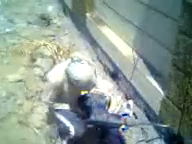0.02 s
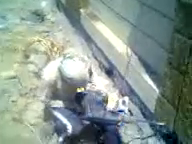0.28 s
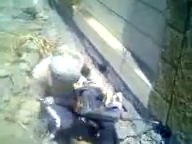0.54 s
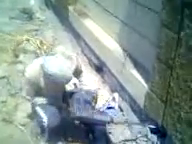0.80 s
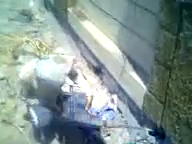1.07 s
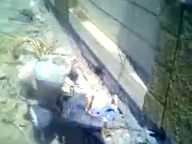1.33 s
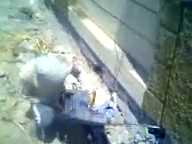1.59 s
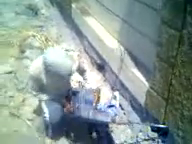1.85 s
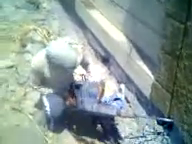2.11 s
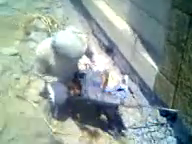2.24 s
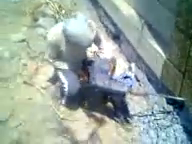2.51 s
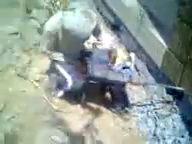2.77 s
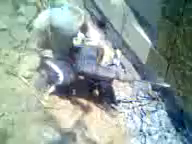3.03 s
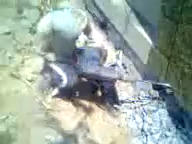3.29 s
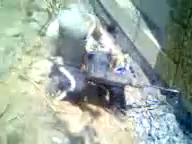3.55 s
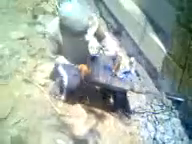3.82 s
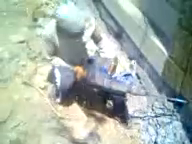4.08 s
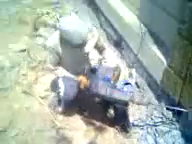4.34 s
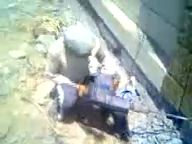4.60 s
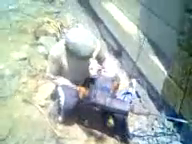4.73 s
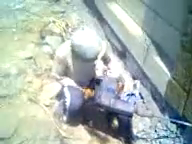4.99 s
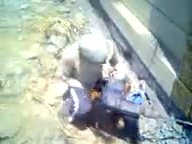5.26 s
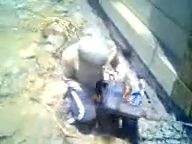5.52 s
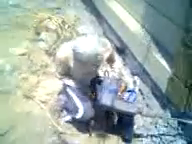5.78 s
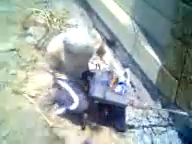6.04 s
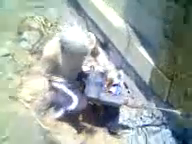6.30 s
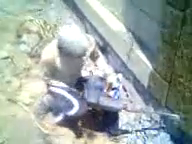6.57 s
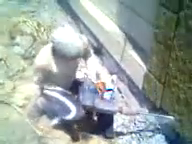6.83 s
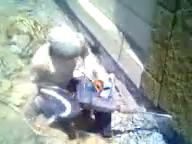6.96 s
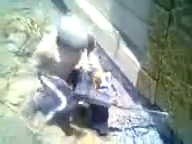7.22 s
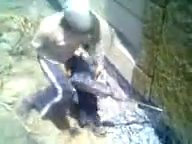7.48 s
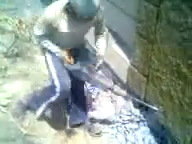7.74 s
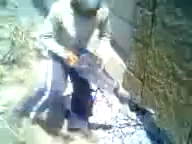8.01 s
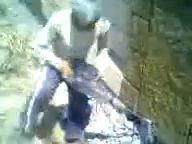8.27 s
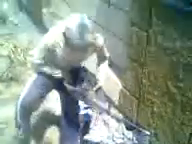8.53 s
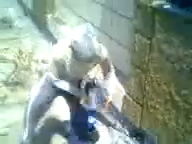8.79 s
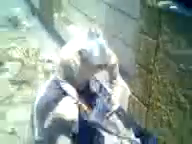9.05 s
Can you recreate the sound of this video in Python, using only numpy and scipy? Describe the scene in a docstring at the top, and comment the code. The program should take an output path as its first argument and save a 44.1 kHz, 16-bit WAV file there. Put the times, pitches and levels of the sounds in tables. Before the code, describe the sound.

An electric demolition breaker hammers a brick wall outdoors, close to a small phone microphone, at about 28 blows a second. Each blow combines a steel clank and crack with a gritty low thump when the chisel bites. The first burst stops at about 0.5 seconds; the freed chisel rings briefly with a high tone, and the motor whirs on quietly with a fan hiss. A second burst runs from 2.7 to 3.8 seconds, ending in bright ringing, then the motor fades low. The longest burst lasts from 5.4 to 7.4 seconds, followed by a faint jingle of the loose chisel. Hammering returns near 8 seconds, lighter and more metallic at first, ending on a hard hit at 8.6. The chisel jingles again and the motor coasts down. The sound is narrow and distorts on hard blows, with a very short echo and barely audible background rumble.

```python
"""An electric breaker hammers a brick wall about 28 times a second, close to a small phone microphone.
In each blow the piston clanks, the steel cracks and, when the chisel bites, the brick thumps, heard through
the overloaded phone as a falling chirp. After half a second the freed chisel rings; the motor whirs on.
Bursts return near 2.7, 5.4 and 8 s; the loose chisel jingles after the last two, and the motor coasts.
Throughout, the phone keeps a narrow band and clips on hard blows, which alone puts sound above it."""
import sys
import numpy as np
from scipy import signal
from scipy.fft import rfft, irfft, next_fast_len
from scipy.io import wavfile
from scipy.ndimage import uniform_filter1d, map_coordinates

SR = 44100
rng = np.random.default_rng(int(sys.argv[2]) if len(sys.argv) > 2 else 0)


def generate_wav(signal):
    """Clip the signal to [-1, 1] and save it as 16-bit WAV at the path in sys.argv[1]."""
    frames = np.transpose(np.atleast_2d(signal))
    scaled = np.clip(frames, -1, 1) * 32767
    pcm = np.round(scaled).astype(np.int16)
    wavfile.write(sys.argv[1], SR, pcm)


N = 403956

# Chisel blows, levels relative within each column:
# (time [s], crack [dB], thump [dB], nominal length [ms], final chirp pitch [Hz], chisel ring [dB])
BLOWS = [(0.002, -6.5, -13.5, 3.3, 363.5, -8), (0.032, -0.5, -3, 11.0, 288.5, -25),
         (0.07, -7, -6, 13.0, 304, -25), (0.105, -10, -7.5, 10, 421, -15.5),
         (0.138, -4.5, 1, 4.7, 245, -36.5), (0.172, -6.5, -5.5, 5.1, 224, -28),
         (0.208, -33.5, -39.5, 6.0, 697, -34), (0.246, -4.5, -12.5, 9.4, 386, -32.5),
         (0.282, -5, -48.5, 2.0, 470, -21.5), (0.319, -42, -40, 18.0, 482, -42.5),
         (0.348, -9, -6.0, 12.0, 239, -29.5), (0.384, -38.5, -32, 2.1, 351, -37),
         (0.421, -25, -46.0, 4.6, 960, -31.5), (0.459, -4, 4.5, 4.4, 603, -27.5),
         (2.736, -23.5, -51.5, 6.6, 780, -25.5), (2.778, -6, -5, 10, 427.5, -34),
         (2.818, -10, -2, 5.1, 455, -20), (2.85, -7, -8.5, 4.4, 378.5, -46),
         (2.887, -3, -3, 4.6, 294.2, -29.5), (2.922, -4.5, -4.5, 2.0, 468, -30.5),
         (2.957, -4, 0.5, 6.0, 394, -17), (2.968, -29, -7.5, 3.5, 300, -40.5),
         (2.992, -3.0, -5.5, 4.2, 319, -31), (3.023, -3.5, -25, 5.2, 863, -50.5),
         (3.061, -2.5, -2.5, 9.2, 400, -29.5), (3.097, -15.5, 1, 8.2, 246, -19.5),
         (3.135, -17.0, -8, 11.0, 222, -39.0), (3.205, -10.5, 0, 8.2, 431, -40.5),
         (3.241, -8, -5.5, 7, 349, -49), (3.306, -7, -5, 10, 696.4, -42.5),
         (3.334, -22.5, -50.5, 4.9, 451, -50), (3.452, -19, -53, 6.6, 857, -36.5),
         (3.485, -13, -7.5, 11, 458.4, -31.5), (3.519, -20.5, -49.5, 5.1, 570, -40),
         (3.557, -5.5, -0.5, 10.0, 391.5, -45.5), (3.592, -4.5, -14.5, 4.4, 688, -26.5),
         (3.626, -5, -3.5, 17.6, 577, -28), (3.644, -49, -2.5, 6.8, 542, -38.5),
         (3.661, -5, -6.5, 5, 477, -42.0), (3.697, -2, -0.5, 14, 358, -30.5),
         (3.717, -30.5, -3.5, 5, 280, -38), (3.733, -8.0, -8.5, 5.3, 246, -22),
         (3.773, -4.5, -6.5, 42, 606.5, -9), (3.791, -1.5, -9, 23, 724, -25),
         (3.806, 0.5, -12, 7.7, 645, -9.5), (5.388, -3, -3, 12, 523, -43), (5.405, -26, -7, 8.9, 425, -27),
         (5.423, -3.5, -4.5, 11, 405, -40.5), (5.434, -25, -2.5, 2.7, 447, -45),
         (5.443, -22, -3.5, 9, 550, -36.5), (5.492, -11.5, -51.5, 3.5, 680, -15.5),
         (5.523, -3.5, -1.5, 4.9, 725, -20.5), (5.562, -9.5, -11, 1.4, 673, -17),
         (5.601, -3, -8.5, 8.0, 322, -16), (5.637, -2.5, -3, 18.0, 659, -20),
         (5.671, -8, -5, 12, 242.7, -16), (5.702, -24, -17.5, 5.4, 440, -17.5),
         (5.74, -9.5, -9, 1.3, 440, -30.5), (5.776, -6.5, -6.5, 4.8, 247.3, -30.5),
         (5.816, -5.5, -4.5, 10, 277.7, -38.5), (5.845, -5, -8, 2.6, 800, -18),
         (5.88, -16, -20.5, 4.9, 527, -30), (5.912, -14, -47.5, 5.5, 605, -26),
         (5.95, -14, -20, 3.3, 459, -19), (5.985, -13.5, -39, 28, 445, -23.5),
         (6.026, -7, -4, 20.0, 288.7, -23), (6.063, -11.5, -9.5, 7.3, 250, -36.5),
         (6.098, -12, -0.5, 8.4, 447, -33.5), (6.13, -7.5, -4.5, 4.4, 218, -44),
         (6.162, -12, -27.5, 3.8, 481, -51), (6.196, -12, -23, 4.5, 490, -50),
         (6.236, -16.5, -4.5, 20.0, 343, -44.5), (6.263, -35, -3.5, 20, 447, -49),
         (6.303, -16, -18, 2.3, 595, -21), (6.339, -15.5, -18.5, 4, 678, -49),
         (6.372, -12.0, -39, 4.9, 930, -26), (6.412, -6, -3.5, 8.5, 253.7, -50.5),
         (6.444, -11, -24, 1.9, 439, -30), (6.479, -10.5, -5.0, 11.0, 425, -31),
         (6.518, -6.5, -4, 12.0, 267, -22), (6.554, -7, -3, 22, 310.5, -40.5),
         (6.581, -17.5, -7, 5.7, 400, -30), (6.591, -3, -1.5, 12.0, 375, -24),
         (6.623, -3, -7.5, 8.3, 527, -33), (6.658, -4, -4, 8.0, 282, -31.5),
         (6.697, -5.5, -4.5, 13, 266, -37), (6.73, -3, 0, 4.1, 567, -34), (6.765, -9.5, -6, 15, 446, -12),
         (6.785, -20.5, -5.5, 8, 357, -21), (6.803, -12.5, 7, 8.2, 271.3, -20.5),
         (6.838, -2.5, -3, 17, 588, -24.5), (6.874, -1.5, -2.5, 12.0, 365, -27.5),
         (6.908, -4.0, -4, 5.5, 280, -37), (6.939, -6, -7.5, 10.0, 400, -18),
         (6.977, -3, 0.5, 8.3, 373, -24.5), (7.01, -5, -7, 1.7, 450, -37),
         (7.045, -2.5, -16, 9.9, 764, -21.5), (7.082, -3.5, -4, 5.0, 371, -29.5),
         (7.118, -9, -1.5, 8.1, 256.4, -25), (7.153, -7.5, -2.5, 15, 322.4, -25),
         (7.19, -1.5, -2, 5.0, 315, -48), (7.223, -9, -4, 8.3, 508, -44.0),
         (7.259, -8.5, -5.5, 5.5, 675, -20), (7.298, -4, -1, 8.1, 320, -45),
         (7.328, -5, -6.0, 7.5, 468, -44.5), (7.366, -4, -9.5, 5.3, 486, -46.5),
         (7.401, -5, -9.5, 1.9, 283.5, -28), (7.436, -8.5, -6.5, 11, 270.5, -38.5),
         (7.96, -24.5, -59, 2.3, 620, -29), (7.992, -19.5, -58, 5.9, 858, -27),
         (8.029, -27.5, -49, 3.2, 824, -26), (8.065, -18, -49, 1.6, 544, -21.5),
         (8.1, -17, -49, 4.6, 432, -25), (8.138, -18, -48, 4.9, 552, -29),
         (8.171, -11, -32.5, 7.2, 570, -31), (8.207, -9, -32, 7.1, 527, -22),
         (8.248, -12, -4.5, 4.6, 365, -34), (8.276, -3, -4.5, 12.0, 350, -40),
         (8.35, -10, -45, 12, 595, -30), (8.385, -13, -6.5, 9, 294.6, -34.5),
         (8.422, -14, -49, 3.5, 632, -26), (8.456, -11, -50, 3.7, 557, -19.5),
         (8.49, -11.5, -50, 8.5, 827, -29), (8.525, -5, -9.5, 3.5, 635, -19),
         (8.564, -14, -50, 7.4, 400, -24), (8.597, -3, -2.5, 27, 247, -31),
         (8.622, -20.5, -10, 3.4, 506, -40), (8.634, 2, 0, 20, 234, -34.5)]
# Spectrum of crushing brick: (frequency [Hz], level [dB])
CRUSH_SPECTRUM = [(30, -33.5), (100, -4.5), (250, -3.5), (500, 3.5), (1000, 0), (2000, -3.5), (3000, -19.5),
                  (4400, -19.5)]
# Resonances of the wall, the struck steel and the motor housing: (frequency [Hz], width [Hz], gain [dB])
WALL_MODES = [(273, 45, 0.5)]
STEEL_MODES = [(570, 810, -8), (1633, 220, 7), (2443, 310, 2.5), (2810, 620, 2.5), (3580, 780, 3.5)]
HOUSING_MODES = [(538, 190, -3), (1520, 120, -12), (1905, 110, 0.5), (2434, 310, 0.5), (2790, 130, -7),
                 (3372, 250, 5)]
# How hard the piston clanks on its anvil: (time [s], level [dB])
CLANK_LEVELS = [(0, -6), (.5, -42.5), (2.8, -25), (3.5, -35.5), (3.8, -19), (5.4, -28), (6.5, -29.5),
                (7.45, -26), (8.1, -33), (8.3, -20.5), (8.65, -15.5)]
# Even ringing of the freed chisel: (time [s], length [s], level [dB])
FREE_RINGS = [(0.604, 0.0079, -20), (0.715, 0.023, -26.5), (0.802, 0.012, -22.5), (0.83, 0.01, -23.5),
              (0.868, 0.087, -31.5), (3.733, 0.03, -21), (3.769, 0.039, -12), (3.804, 0.053, -20),
              (5.495, 0.055, -13), (5.561, 0.018, -21), (5.599, .02, -13), (5.673, .03, -21),
              (6.834, 0.049, -19.5), (7.043, 0.02, -13)]
# Motor, loaded in bursts and coasting between: (time [s], gear level [dB], fan over gears [dB])
MOTOR_LEVELS = [(0, -19, -3.5), (.28, -24.5, -3), (.56, -37.5, 10.5), (1.731, -38.5, 15), (2.1, -41.5, 5.5),
                (2.72, -40.5, 9), (2.8, -30, 7), (3.1, -34.5, -3), (3.45, -46.5, 7.5), (3.7, -27.5, 5.5),
                (3.88, -44.5, 4.5), (4.67, -58, 11), (5.35, -59, 11), (5.5, -26.5, 1.5), (6.3, -33.5, -4.5),
                (6.76, -32, 3.5), (7.42, -38.5, 8), (7.53, -47, 8), (7.85, -63, 20.5), (8.14, -32.5, 6),
                (8.45, -30, -5.5), (8.68, -45.5, 10), (9.16, -59.5, 19)]
# Spectrum of the fan's hiss: (frequency [Hz], level [dB])
FAN_SPECTRUM = [(40, -33), (400, -30.5), (900, -27.5), (1400, -16), (1800, -16.5), (2300, -13.5),
                (2700, -12), (3450, -9.5), (4400, -18.5)]
# Faint motor tones: (frequency [Hz], level over gear noise [dB])
HUM_TONES = [(484.5, -18), (1647, -13), (1701, -17), (1960, -14), (2191, -12)]
# Pings of the loose chisel: (time [s], relative level [dB])
JINGLES = [(7.5144, -33.5), (7.5248, -30.5), (8.703, -24), (8.7215, -24), (8.735, -27.5), (8.757, -30),
           (8.772, -33), (8.7944, -32)]
# Spectrum of the distant building site: (frequency [Hz], level [dB])
SITE_SPECTRUM = [(25, -20), (100, -10), (300, -3.5), (500, 4.5), (1000, -2), (3500, -11), (4000, -30.5)]
# Passband of the phone: (frequency [Hz], gain [dB])
PHONE_BAND = [(20, -7), (200, -1.5), (300, -3.5), (3700, -3), (4000, -15), (4400, -16.5), (4700, -73),
              (5200, -110)]

RING_HZ, PISTON_HZ, JINGLE_HZ = 3473, 1684, 2350
LEAD_S = .03  # a blow's envelopes begin this long before contact
T = np.arange(round(.1 * SR)) / SR - LEAD_S  # time from contact [s]


def steel_crack():
    """Impact excites the broad modes of the steel: a burst with a sharp spike at contact."""
    level = np.zeros(N)
    for s, db, _, ms, _, _ in BLOWS:
        burst = swell(T + .00076, rise=.0031, hold=.0013 + .39 * ms / 1000, t60=.027)
        spike = swell(T - .001, rise=.00036, hold=.00086, t60=.0031)
        add(level, s - LEAD_S, amp(db - 4.5) * burst + amp(db - 5) * spike)
    return level * dense(noise(lambda f: modes(STEEL_MODES, f)))


def brick_thump():
    """Overload: each hard blow comes through the phone as a low thump with a falling chirp."""
    thump = np.zeros(N)
    roughness = .1199 * wobble(250)  # a fast random wobble roughens the chirp
    for s, _, db, ms, end_hz, _ in BLOWS:
        length, phase = ms / 1000, rng.random()
        start_hz = 1166.6 * rng.uniform(.8, 1.2)
        hz = end_hz + (start_hz - end_hz) * np.exp(-np.maximum(T, 0) / (.3992 * length))
        hz *= 1 + np.resize(roughness[round(s * SR):], len(T))
        chirp = np.sin(2 * np.pi * (np.cumsum(hz) / SR + phase))
        envelope = swell(T - .0015, rise=.0023, hold=.82 * length, t60=.008)
        add(thump, s - LEAD_S, amp(db + 1.5) * envelope * chirp)
    return thump * amp(1.65 * wobble(180))  # the level holds unevenly


def brick_crush():
    """A tight train of fractures merges into a burst of noise at each blow."""
    level = np.zeros(N)
    for s, _, db, ms, _, _ in BLOWS:
        add(level, s - LEAD_S, amp(db - 4) * swell(T, rise=.0012, hold=.65 * ms / 1000, t60=.02))
    return level * dense(noise(lambda f: along(CRUSH_SPECTRUM, f)))


def piston_clank():
    """The piston excites a resonance as it strikes the anvil, just before the chisel meets the wall."""
    level = np.zeros(N)
    for s, *_ in BLOWS:
        db = np.interp(s, *np.transpose(CLANK_LEVELS))
        add(level, s - LEAD_S, amp(db) * swell(T + .011, rise=.0017, hold=.0061, t60=.027))
    return level * dense(band(PISTON_HZ, width_hz=150), ms=10)


def anvil_note():
    """The anvil transmits the impact to the chisel, whose mode sounds ahead of the crack."""
    level = np.zeros(N)
    for s, crack_db, *_ in BLOWS:
        add(level, s - LEAD_S, amp(crack_db - 18) * swell(T + .0082, rise=.0024, hold=.0036, t60=.028))
    return level * dense(band(RING_HZ, width_hz=250), ms=18)


def chisel_ring():
    """Damped vibration: the chisel's mode decays exponentially after each blow."""
    level = np.zeros(N)
    for s, *_, db in BLOWS:
        add(level, s - LEAD_S, amp(db) * swell(T, rise=.0054, hold=.0074, t60=.053))
    return level * dense(band(RING_HZ, width_hz=320), ms=18)


def free_ring():
    """Free vibration: clear of the brick, the chisel holds a nearly pure tone."""
    level = np.zeros(N)
    for s, length, db in FREE_RINGS:
        add(level, s - LEAD_S, amp(db) * swell(T, rise=.002, hold=length, t60=.013))
    return level * wavering(RING_HZ, spread_hz=15, rate=77)


def jingle():
    """Light collisions of the loose chisel with its holder excite one steel mode."""
    level, t = np.zeros(N), np.arange(round(.039 * SR)) / SR
    for s, db in JINGLES:
        add(level, s, amp(db - 4.5) * swell(t - .003, rise=.0031, hold=.0021, t60=.024))
    return level * dense(band(JINGLE_HZ, width_hz=200))


def motor():
    """Forced vibration: gears drive the housing's modes, with fan hiss, whine and hum, all fluttering."""
    times, *levels = np.transpose(MOTOR_LEVELS)
    gear_db, fan_db = [np.interp(np.arange(N) / SR, times, db) for db in levels]
    gears = noise(lambda f: modes(HOUSING_MODES, f), patchy_db=5)
    fan = amp(fan_db) * noise(lambda f: along(FAN_SPECTRUM, f), patchy_db=3.5)
    whine = amp(-10.5) * band(PISTON_HZ, width_hz=90)
    hum = sum(amp(db) * wavering(hz, spread_hz=4, rate=8) for hz, db in HUM_TONES)
    flutter_db = .5 * wobble(42) + .82 * wobble(120)
    return amp(gear_db + flutter_db) * (gears + fan + whine + hum)


def yard_echo(x, t60=.11):
    """Diffuse reflection from wall and ground adds a short, coloured tail."""
    t = np.arange(SR // 4) / SR
    tail = rng.standard_normal(len(t)) * amp(-60 * t / t60)
    echo = signal.fftconvolve(x, tail / np.linalg.norm(tail))[:N]
    return filtered(echo, lambda f: along([(200, 3), (1500, -3), (4000, 4.5)], f))


def site_rumble():
    """The distant sounds of the site sum incoherently to a low noise."""
    return noise(lambda f: along(SITE_SPECTRUM, f), patchy_db=3.5)


def amp(db):
    """Amplitude ratio of a level in decibels."""
    return 10 ** (np.asarray(db) / 20)


def unit(x):
    """Normalisation to rms 1."""
    return x / np.sqrt(np.mean(x ** 2) + 1e-20)


def along(points, hz):
    """Gain interpolated through (frequency [Hz], level [dB]) points on a log axis."""
    f, db = np.transpose(points)
    return amp(np.interp(np.log(hz + 1), np.log(f + 1), db))


def modes(table, f):
    """Modal superposition: damped resonances summed with alternating sign."""
    return sum((-1) ** k * amp(db) * 1j * f * width / (hz * hz - f * f + 1j * f * width)
               for k, (hz, width, db) in enumerate(table))


def filtered(x, response):
    """Linear filtering: the spectrum of x times a frequency response."""
    size = next_fast_len(N + SR // 2)
    return irfft(rfft(x, size) * response(np.fft.rfftfreq(size, 1 / SR)), size)[:N]


def noise(response, patchy_db=0):
    """Coloured noise of rms 1, modulated in random patches of time and frequency."""
    spectra = signal.stft(rng.standard_normal(N), nperseg=256)[2]
    patches = uniform_filter1d(rng.standard_normal(spectra.shape), 3, axis=0)
    patches = unit(uniform_filter1d(patches, 4, axis=1))
    patchy = signal.istft(spectra * amp(patchy_db * patches), nperseg=256)[1][:N]
    return unit(filtered(patchy, response))


def band(hz, width_hz):
    """Narrowband noise: random excitation of two equal resonators in series."""
    return noise(lambda f: modes([(hz, width_hz, 0)], f) ** 2)


def dense(x, ms=3):
    """Division by the running rms evens out the level."""
    power = np.abs(uniform_filter1d(x * x, int(ms * SR / 1000)))
    return unit(x / np.sqrt(power + 1e-3))


def wobble(rate):
    """A smooth random curve with rate knots a second."""
    knots = rng.standard_normal(int(N * rate / SR) + 4)
    return map_coordinates(knots, [np.arange(N) * rate / SR])


def wavering(hz, spread_hz, rate):
    """A sine under slight random amplitude and frequency modulation."""
    level = amp(1.5 * wobble(rate))
    return level * np.sin(2 * np.pi * np.cumsum(hz + spread_hz * wobble(rate)) / SR)


def swell(t, rise, hold, t60):
    """Envelope: exponential growth up to t = 0, a flat top, then exponential decay; times in seconds."""
    return np.minimum(np.exp(np.minimum(t, 0) / rise), amp(-60 * np.maximum(t - hold, 0) / t60))


def add(track, s, piece):
    """Superpose piece on track from time s on."""
    i = round(s * SR)
    piece = piece[max(-i, 0):N - i]
    track[max(i, 0):][:len(piece)] += piece


def scene():
    """Superposition: the blows, the wall's resonant boom, the echo and the background add as pressures."""
    brick = brick_thump() + brick_crush()
    boom = amp(2.2) * filtered(brick, lambda f: modes(WALL_MODES, f))
    steel = piston_clank() + anvil_note() + steel_crack() + chisel_ring() + free_ring()
    blows = brick + boom + steel
    echo = amp(-18.5) * yard_echo(blows)
    site = amp(-61) * site_rumble()
    return (blows + echo + motor() + jingle() + site)[None]


def record(dry):
    """Nonlinear distortion: the level saturates softly, the band narrows, clipping adds overtones."""
    saturation_knee, ceiling, top_hz = 1.51, .715, 16500
    saturated = dry[0] / (1 + np.abs(dry[0] / saturation_knee) ** 4.35) ** (1 / 4.22)
    narrow = filtered(saturated, lambda f: along(PHONE_BAND, f))
    clipped = narrow / (1 + np.abs(narrow / ceiling) ** 24) ** (1 / 24)
    return filtered(clipped, lambda f: np.clip((top_hz - f) / 600, 0, 1) ** 2)[None]


dry = scene()
out = record(dry)
generate_wav(out)
```